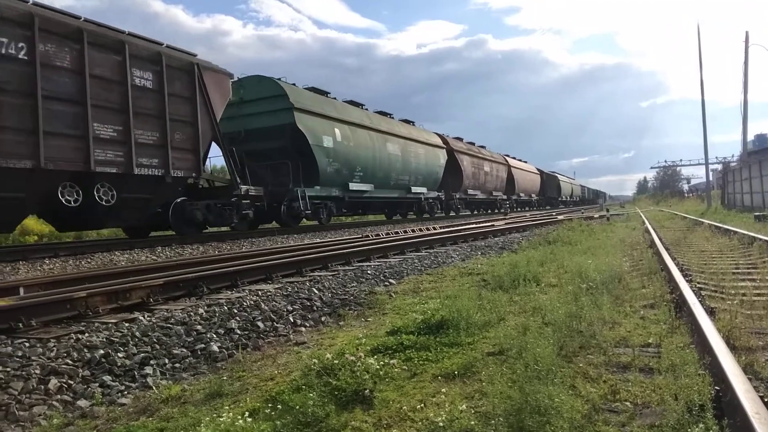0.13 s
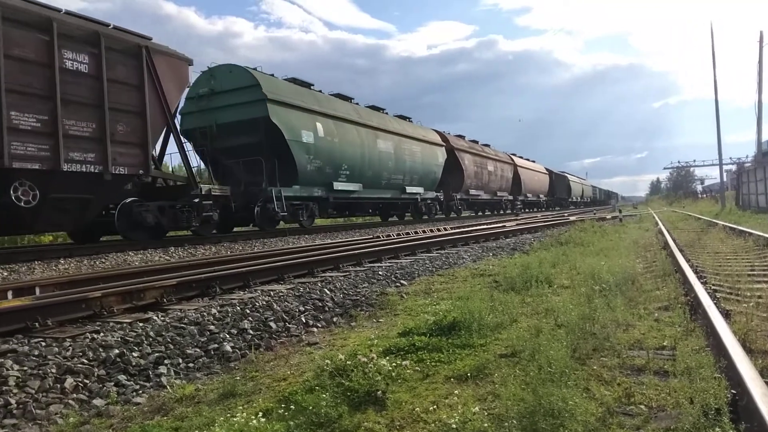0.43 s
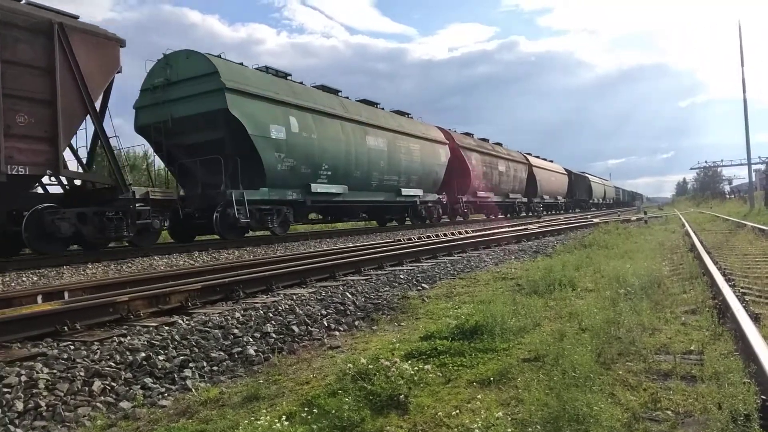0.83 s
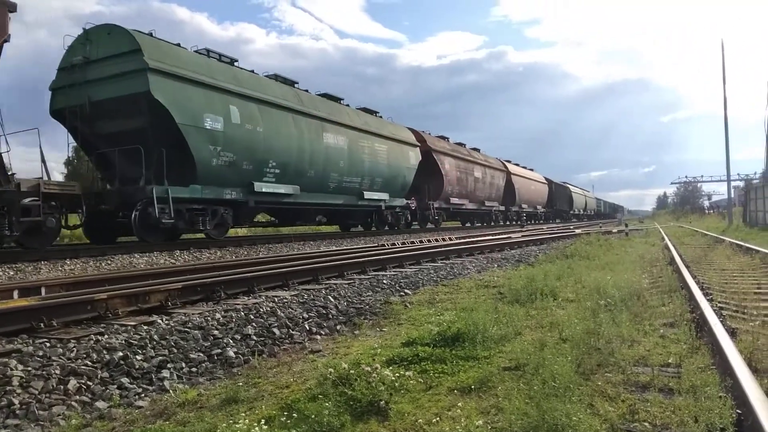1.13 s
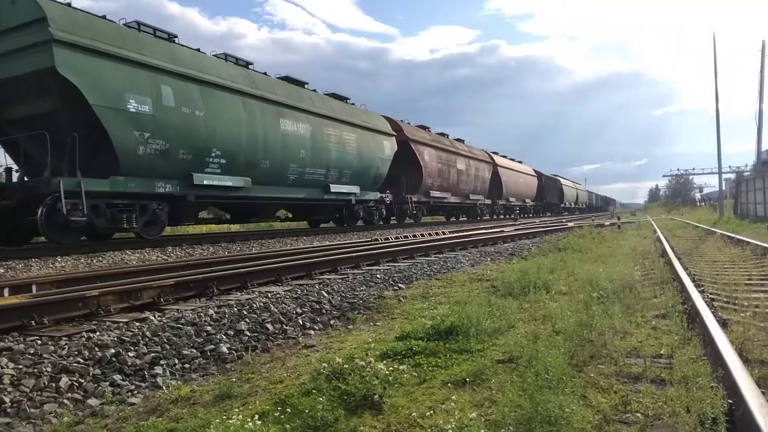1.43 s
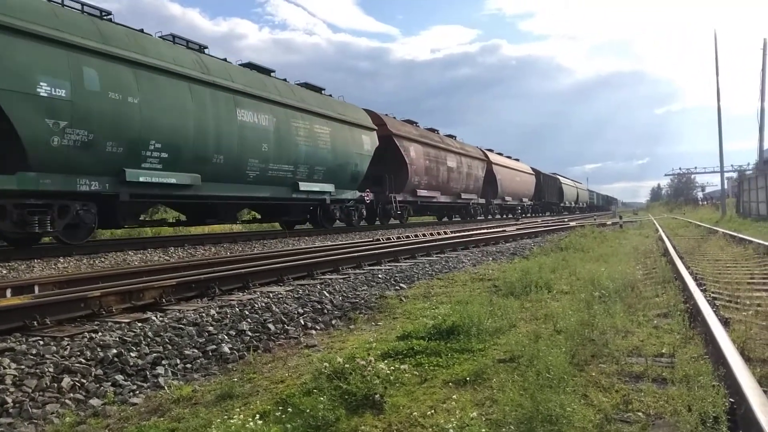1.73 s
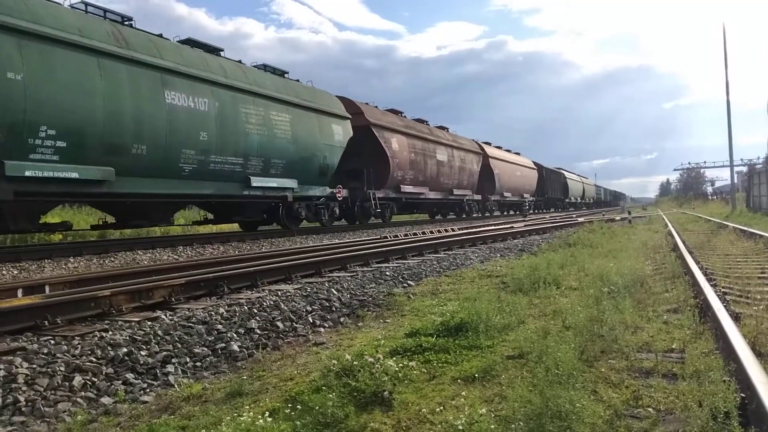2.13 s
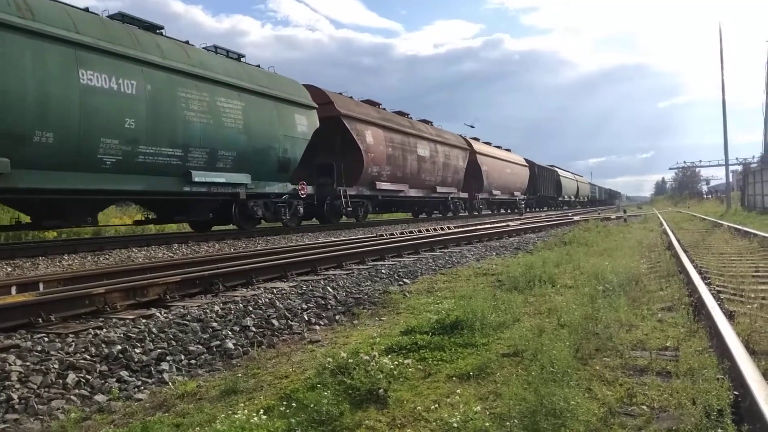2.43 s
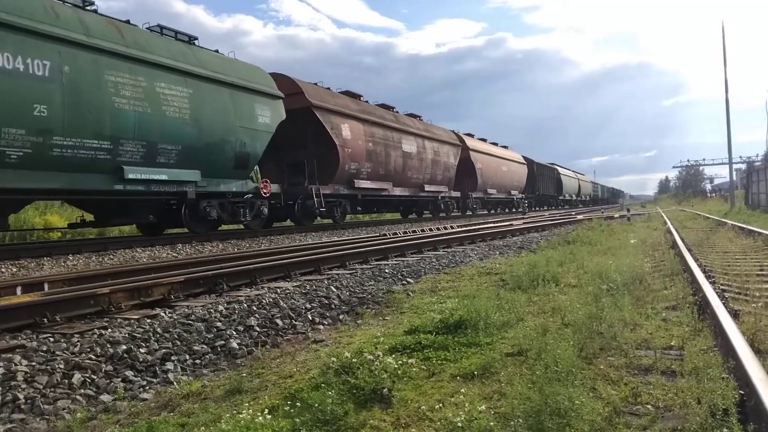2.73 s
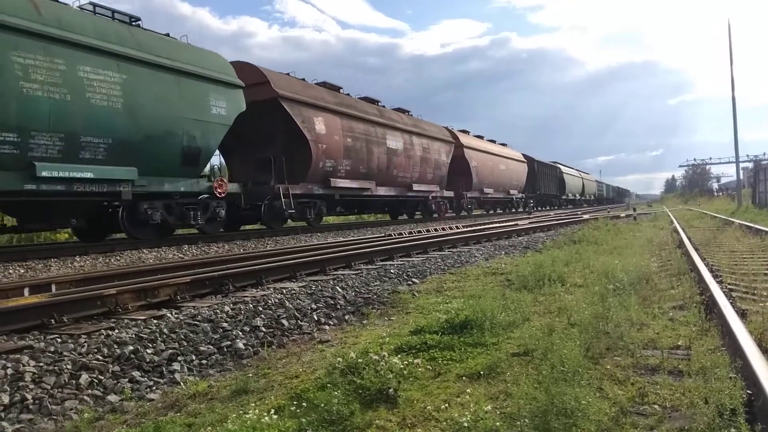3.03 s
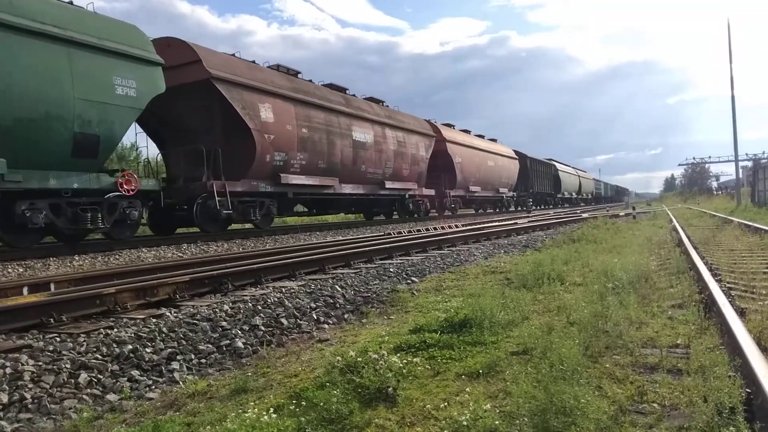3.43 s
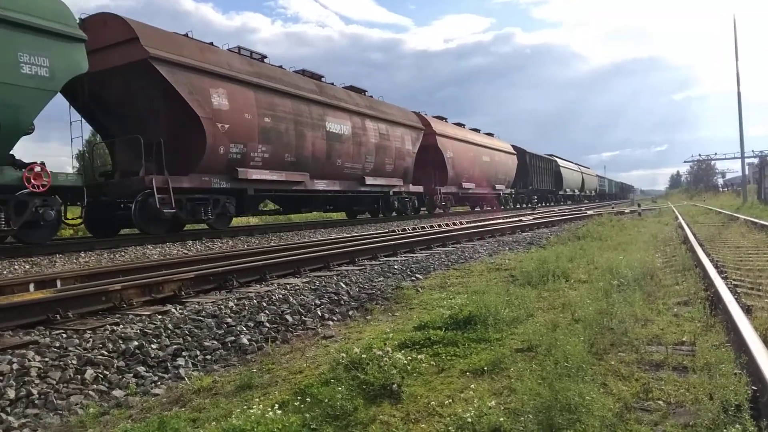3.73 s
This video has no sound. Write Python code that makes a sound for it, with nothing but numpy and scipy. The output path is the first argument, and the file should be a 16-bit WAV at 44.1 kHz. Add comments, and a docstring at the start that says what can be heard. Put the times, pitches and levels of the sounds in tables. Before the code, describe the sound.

A freight train rolls past outdoors, close in stereo, with gritty steel roar, ground rumble and droning wagon bodies throughout. Ringing, rattling knocks come about every half second, strong near 1.3 s, with fainter ones between. A low pulsing hum fades after 1.5 s. Small squeaks scatter; bright flange hisses start at 2.1 s, with a brief squeal, and 2.7 s. The last knock, at 3.7 s, thuds with a short hollow panel ring.

```python
"""Freight wagons roll past outdoors, a few metres from two microphones: gritty noise and wheel modes make the roar.
The wheels knock: a worn one about twice a second, with fainter knocks between; each knock is a crowd of contacts
heard as a thud, a ringing clank and a bright rattle.
Twice a flange rubs the rail with a bright hiss of many modes; the first rub also sings in steady partials.
Filtered noise makes the small squeaks, two decaying tones a short panel ring near the end.
Behind it the ground rumbles and the wagon bodies drone, under a low hum with its octave that fades away."""
import sys
import numpy as np
from scipy import signal
from scipy.fft import rfft, irfft
from scipy.io import wavfile

SR = 44100
rng = np.random.default_rng(int(sys.argv[2]) if len(sys.argv) > 2 else 0)


def unload_audio(sound):
    """Save the sound as a 16-bit wav file, at the path given as the first command line argument."""
    columns = np.transpose(np.atleast_2d(sound))
    # keep every value between -1 and 1, then stretch to whole-number steps
    steps = np.round(np.clip(columns, -1, 1) * 32767)
    wavfile.write(sys.argv[1], SR, steps.astype(np.int16))


N = 171108
T = np.arange(N) / SR  # seconds
BINS_HZ = np.maximum(np.arange(N // 2 + 1) * SR / N, 1)


def from_db(db):
    """Decibels to amplitude gain."""
    return 10 ** (np.asarray(db) / 20)


def rms_one(x):
    """Scale to unit power."""
    return x / np.sqrt(np.mean(x ** 2) + 1e-20)


def level_at(rows):
    """A level curve, in dB, at every sample."""
    seconds, db = np.transpose(rows)
    return np.interp(T, seconds, db)


def at_hz(points, falls_db=0):
    """A table over log frequency; beyond its ends it sinks by falls_db an octave."""
    hz, value = np.transpose(points)
    octaves_outside = np.abs(np.log2(BINS_HZ / np.clip(BINS_HZ, hz[0], hz[-1])))
    return np.interp(np.log(BINS_HZ), np.log(hz), value) - falls_db * octaves_outside


def drift(rate):
    """Slow random wandering with spread 1: noise through two equal low-pass poles at rate Hz."""
    step = 40  # samples between drawn values
    pole = np.exp(-2 * np.pi * rate * step / SR)
    settle = 2000  # values dropped while the filter settles
    noise = rng.standard_normal(N // step + settle + 2)
    slow = signal.lfilter([1], [1, -2 * pole, pole * pole], noise)[settle:]
    return np.interp(np.arange(N) / step, np.arange(len(slow)), rms_one(slow))


def white():
    """Two unrelated white noises."""
    return rng.standard_normal((2, N))


def contacts(rate, spread_db):
    """Two random trains of tiny metal contacts, rate a second each, of uneven size and either sign."""
    size_db = spread_db * np.minimum(rng.exponential(1, (2, N)), 2)
    sizes = from_db(size_db) * rng.choice([-1, 1], (2, N))
    return rms_one(sizes * (rng.random((2, N)) < rate / SR))


# How alike the sound is at the two microphones.
# Each row: frequency in Hz, left-right likeness from 0 to 1.
LIKENESS = [(30, .9), (80, .95), (300, .94), (450, .55), (900, .62), (1750, .7), (2200, .2), (3300, .45),
            (5000, .25), (12000, .05)]


def radiate(drive, gain):
    """Two drives through one frequency response, spread over both microphones; unit power."""
    mid, side = rfft(drive) * gain
    alike = np.clip(at_hz(LIKENESS), 0, .995)
    opposite = np.array([[1], [-1]])
    return rms_one(irfft(np.sqrt(1 + alike) * mid + np.sqrt(1 - alike) * side * opposite, N))


def shaped(drive, spectrum):
    """Radiate through a tabled spectrum with steep ends."""
    return radiate(drive, from_db(at_hz(spectrum, falls_db=50)))


def resonance(hz, width):
    """Friction noise through one mode, width Hz wide at half amplitude."""
    return radiate(white(), 1 / (1 + (2 * (BINS_HZ - hz) / width) ** 2))


def swell(s, rise, fall):
    """Exponential rise to a peak of 1 at s, then exponential fall; times in seconds."""
    return np.exp(-np.maximum((s - T) / rise, (T - s) / fall))


# Level of the rolling wheels as they pass. Each row: time in seconds, level in dB.
ROLL_LEVEL = [(0, -23), (.55, -24), (.72, -25.5), (.95, -24), (1.5, -26), (1.92, -25), (2.05, -26.5),
              (2.3, -25.5), (2.6, -27.5), (2.95, -27.5), (3.4, -28), (3.88, -28)]
# Colour of the wheel roar. Each row: frequency in Hz, relative density in dB.
ROLL_SPECTRUM = [(400, -33), (900, -10.5), (1400, 0), (1700, -1.5), (1900, -5), (2150, -5), (2700, -1),
                 (3500, -5), (4600, -9), (5600, -10.5), (7100, -9), (8000, -17), (9100, -30), (10900, -29),
                 (12700, -37), (16000, -37)]
# Wheel modes kept ringing by the rolling.
# Each row: frequency in Hz, width in Hz, level in dB against the roar.
WHEEL_MODES = [(816, 24, -25), (1680, 54, -12), (2097, 99, -12), (2336, 110, -16), (2430, 45, -15.5),
               (5610, 200, -17.5), (6920, 250, -17), (10680, 400, -32.5)]


def rolling():
    """Gritty roar of steel on steel: noise plus contacts, with wheel modes that come and go."""
    grit = white() + from_db(-4.5) * contacts(rate=900, spread_db=5.5)
    roar = shaped(grit, ROLL_SPECTRUM) * from_db(0.74 * drift(42))
    rings = 0
    for hz, width, db in WHEEL_MODES:
        rings = rings + from_db(db + 3.3 * drift(6.5)) * resonance(hz, width)
    return from_db(level_at(ROLL_LEVEL)) * (roar + rings)


# Knocks of the wheels: a worn one about twice a second, with fainter ones between.
# Each row: peak time in seconds, then the levels of clank, rattle and thud in dB.
KNOCKS = [(0.33, -23, -20.5, -43), (.56, -26.5, -28, -45), (0.814, -23.5, -22.5, -39),
          (1.291, -17.5, -20, -45), (1.778, -20.5, -21, -27), (1.905, -29, -37, -31),
          (2.242, -19.5, -20.5, -33.5), (2.750, -22, -21, -31), (3.232, -27.5, -21, -47),
          (3.716, -21.5, -21, -23)]
# Colours of the three parts. Each row: frequency in Hz, relative gain in dB.
CLANK_SPECTRUM = [(900, -6), (1600, -6.5), (2100, -5), (2900, -4), (3800, -14), (6000, -55)]
RATTLE_SPECTRUM = [(2000, -33), (3300, 1), (4800, -1), (6600, 0), (7500, -4), (9000, -22), (11000, -20),
                   (13000, -33), (16000, -40)]
THUD_SPECTRUM = [(200, 10), (350, -9), (500, -1.5), (620, 3.5), (760, -7.5), (1200, 1.5), (2000, -41)]
# The ring of the wheels in every clank.
# Each row: frequency in Hz, width in Hz, gain in dB added to the clank's colour.
CLANK_MODES = [(1560, 90, 8.5), (1930, 51, 7), (2220, 50, 15), (2580, 180, 3), (3000, 310, 4.5)]


def knocks():
    """Each knock is a crowd of contacts: a thud, a ringing clank of the bogie and a bright rattle."""
    clank = sum(from_db(db) * swell(s, rise=.028, fall=.042) for s, db, _, _ in KNOCKS)
    rattle = sum(from_db(db) * swell(s, rise=.029, fall=.034) for s, _, db, _ in KNOCKS)
    thud = sum(from_db(db) * swell(s, rise=.03, fall=.07) for s, _, _, db in KNOCKS)
    ring_db = sum(db / (1 + (2 * (BINS_HZ - hz) / width) ** 2) for hz, width, db in CLANK_MODES)
    parts = (clank, CLANK_SPECTRUM, ring_db), (rattle, RATTLE_SPECTRUM, 0), (thud, THUD_SPECTRUM, 0)
    out = np.zeros((2, N))
    for level, spectrum, extra_db in parts:
        crowd = contacts(rate=1300, spread_db=2.5) + 0.48 * white()
        out += level * radiate(crowd, from_db(at_hz(spectrum, falls_db=24) + extra_db))
    return out


# Flange rubs against the rail.
# Each row: start in seconds, time from start to release in seconds, release decay in seconds, hiss level in dB.
RUBS = [(2.09, 0.19, 0.13, -29.5), (2.68, 0.14, 0.24, -28)]
# Colour of the hiss under its modes. Each row: frequency in Hz, relative gain in dB.
RUB_SPECTRUM = [(3000, -5), (5100, -5), (6800, 7), (8000, -5), (9000, -9), (10500, -4), (11500, -5),
                (12700, -14.5), (15500, -14)]


def flange():
    """A rubbing flange excites a thicket of high wheel modes, heard as a bright hiss."""
    level = 0
    for s, hold, release, db in RUBS:
        attack = np.clip((T - s) / .048, 0, 1)
        level = level + from_db(db) * attack * np.exp(-np.maximum(T - s - hold, 0) / release)
    modes_hz = np.linspace(3000, 15500, 44) + rng.uniform(-130, 140, size=44)
    modes = sum(1 / (1 + ((BINS_HZ - hz) / 30) ** 2) for hz in modes_hz)
    return level * radiate(white(), from_db(at_hz(RUB_SPECTRUM, falls_db=24)) * (.5 + modes))


# Partials of the squeal in the first rub. Each entry: frequency in Hz.
SQUEAL_HZ = [3048, 6104, 7623, 11087, 15132]
# The same partials in the same order. Each entry: mean peak amplitude in dB.
SQUEAL_DB = [-14, -27, -48, -44, -45]
SQUEAL_S, SQUEAL_RISE_S, SQUEAL_FALL_S = 2.148, .04, .04  # peak time, rise and fall
SQUEAL_WANDER, SQUEAL_FLUTTER_DB = 0.001, 1.5  # spread of pitch (fraction) and of level


def squeal():
    """Stick and slip makes the wheel sing for a moment, each side catching its own flutter."""
    rise = ((SQUEAL_S - T) / SQUEAL_RISE_S) ** 2
    level = np.exp(-np.where(T < SQUEAL_S, rise, (T - SQUEAL_S) / SQUEAL_FALL_S))
    phase_per_hz = 2 * np.pi * np.cumsum(1 + SQUEAL_WANDER * drift(120)) / SR
    out = np.zeros((2, N))
    for side in out:
        for hz, db in zip(SQUEAL_HZ, SQUEAL_DB):
            flutter = from_db(db + SQUEAL_FLUTTER_DB * drift(40))
            side += flutter * np.sin(hz * phase_per_hz + 0.19 * drift(22))
    return level * out


# Rough squeaks and rings of single wheel modes.
# Each row: peak time in seconds, frequency in Hz, width in Hz, level in dB, rise in seconds, fall in seconds.
SQUEAKS = [(.13, 12100, 400, -44, .012, 0.014), (.13, 4350, 1200, -30, .012, 0.016),
           (.29, 7170, 150, -31.5, 0.093, 0.095), (.33, 6500, 180, -22.5, .008, 0.0092),
           (.94, 10800, 300, -45, .015, 0.017), (1.535, 10750, 300, -41.5, .025, .02),
           (1.66, 10700, 300, -47, .015, 0.034), (1.66, 6700, 700, -29.5, 0.023, 0.033),
           (1.655, 5000, 1400, -26, 0.024, 0.034), (1.785, 10930, 300, -41, .012, 0.022),
           (1.977, 5520, 150, -29.5, 0.018, 0.025), (2.27, 3055, 60, -28.5, 0.06, .08),
           (2.398, 2910, 160, -24, 0.0087, 0.014), (2.50, 5520, 200, -33, .025, 0.038),
           (2.745, 3055, 90, -26, .02, 0.077), (2.80, 10200, 50, -44, .05, .25),
           (2.82, 6700, 300, -39, .05, 0.16), (2.97, 5100, 71, -40, .08, 0.2)]


def squeaks():
    """Brief rubs that excite one mode without locking into a tone."""
    out = np.zeros((2, N))
    for s, hz, width, db, rise, fall in SQUEAKS:
        out += from_db(db) * swell(s, rise, fall) * resonance(hz, width)
    return out


# A short low ring, as of a loose panel, at the last knock.
# Each row: frequency in Hz, peak amplitude in dB, decay in seconds.
PANEL = [(619, -30, .035), (1970, -38, .03)]


def panel():
    """A short hollow ring of sheet steel: decaying tones, the same at both microphones."""
    out = 0
    for hz, db, decay in PANEL:
        tone = np.sin(2 * np.pi * hz * T + 0.34 * drift(40))
        out = out + from_db(db) * swell(3.725, rise=.0067, fall=decay) * tone
    return out


# Level of the low hum. Each row: time in seconds, level in dB.
HUM_LEVEL = [(0, -23), (.22, -19), (.36, -19.5), (.62, -28.5), (.84, -20.5), (1.08, -30), (1.25, -21.5),
             (1.5, -34.5), (2.2, -37), (3.88, -55)]
# Level of its octave. Each row: time in seconds, level in dB before the OCTAVE_DB trim.
OCTAVE_LEVEL = [(0.0, -17.5), (0.17, -34.5), (0.29, -18), (0.33, -27), (1.4, -27.5), (1.44, -37.5),
                (1.73, -21), (1.88, -38), (1.92, -21.5), (2.12, -38), (2.18, -24.5), (2.3, -40),
                (2.59, -28.5), (2.61, -40), (3.32, -32), (3.4, -41.5), (3.49, -28), (3.88, -41)]
OCTAVE_DB = -0.5
HUM_HZ, HUM_WANDER = 134.7, 0.0061  # mean pitch and its spread as a fraction
HUM_FLUTTER_DB, HUM_SCATTER = 1.5, 0.32  # spread of level; of the random quadrature part


def hum():
    """A wavering low tone and its octave, pulsing and fading as their source moves away."""
    phase = 2 * np.pi * np.cumsum(HUM_HZ * (1 + HUM_WANDER * drift(5.8))) / SR
    out = 0
    for multiple, db in (1, level_at(HUM_LEVEL)), (2, level_at(OCTAVE_LEVEL) + OCTAVE_DB):
        scatter = HUM_SCATTER * drift(10.5) * np.cos(multiple * phase)
        tone = np.sqrt(2) * (np.sin(multiple * phase) + scatter)
        out = out + from_db(db + HUM_FLUTTER_DB * drift(8.3)) * tone
    return out


# Levels of the ground rumble and of the wagon bodies. Each row: time in seconds, level in dB.
RUMBLE_LEVEL = [(0, -20.5), (.75, -21.5), (1.02, -24), (1.3, -20.5), (1.85, -20.5), (2.05, -24.5),
                (2.45, -23.5), (2.65, -21.5), (3.0, -22.5), (3.88, -22)]
BODY_LEVEL = [(0, -22), (.5, -22.5), (1.2, -24.5), (1.8, -28), (2.1, -28), (2.9, -29.5), (3.4, -30),
              (3.88, -30)]
# Their colours. Each row: frequency in Hz, relative density in dB.
RUMBLE_SPECTRUM = [(10, -9), (25, -9), (48, -1.5), (60, -2.5), (78, 0.5), (105, -2.5), (135, -3),
                   (180, -11.5), (300, -32)]
BODY_SPECTRUM = [(70, -17), (130, -8.5), (170, -5), (200, -3), (240, 1), (300, -3.5), (345, -3), (410, -9),
                 (600, -10.5), (900, -11.5), (1400, -11.5), (2500, -21)]


def rumble():
    """Ground rumble and the drone of the wagon bodies: low noises with slowly wandering levels."""
    ground = from_db(level_at(RUMBLE_LEVEL) + 1.1 * drift(10.6)) * shaped(white(), RUMBLE_SPECTRUM)
    bodies = from_db(level_at(BODY_LEVEL) + 0.95 * drift(13.6)) * shaped(white(), BODY_SPECTRUM)
    return ground + bodies


def scene():
    """All the sounds of the train together."""
    return rolling() + knocks() + flange() + squeal() + squeaks() + panel() + hum() + rumble()


# Colour between the two microphones. Each row: frequency in Hz, left minus right in dB.
MIC_BALANCE = [(100, -.7), (550, -1), (1000, -0.5), (1800, 2), (2500, 6), (3800, 2.5), (5500, 12.5),
               (7000, 17), (8200, 7.5), (9200, -3), (10800, -10), (13000, -4), (15500, 14)]
# The sound reaches the left microphone later, round the recorder's body.
# Each row: frequency in Hz, lag in seconds.
LEFT_LAG = [(130, .00033), (330, .00024), (540, .00008), (720, .00024), (1000, .00037), (1300, .00037),
            (1800, .00031), (2300, .00041), (3050, .00042), (4200, .00036)]
CEILING, CUTOFF_HZ = .85, 15800  # amplitude limit; top of the recorded band


def record(dry):
    """Colour both microphones, delay the left, round the highest peaks and cut the top."""
    tilt = from_db(at_hz(MIC_BALANCE))
    delay = np.exp(-2j * np.pi * BINS_HZ * at_hz(LEFT_LAG))
    keep_power = np.sqrt(2 / (1 + tilt ** 2))
    mics = np.array([tilt * delay, np.ones_like(tilt)]) * keep_power
    heard = irfft(rfft(dry) * mics, N)
    heard = heard / (1 + (heard / CEILING) ** 12) ** (1 / 12)
    return irfft(rfft(heard) / np.sqrt(1 + (BINS_HZ / CUTOFF_HZ) ** 400), N)


dry = scene()
out = record(dry)
unload_audio(out)
```